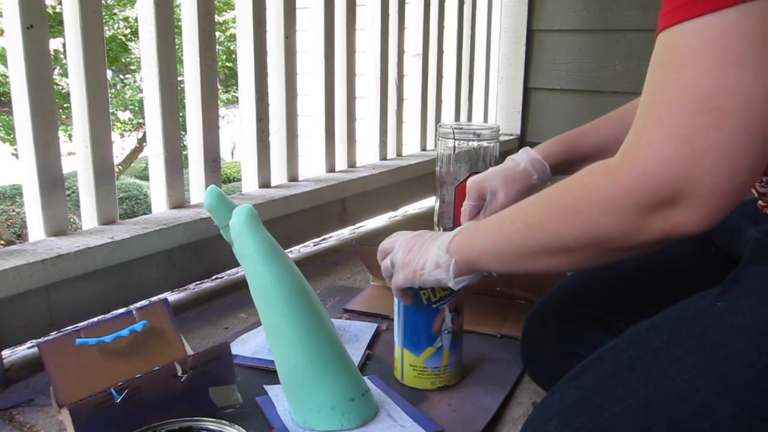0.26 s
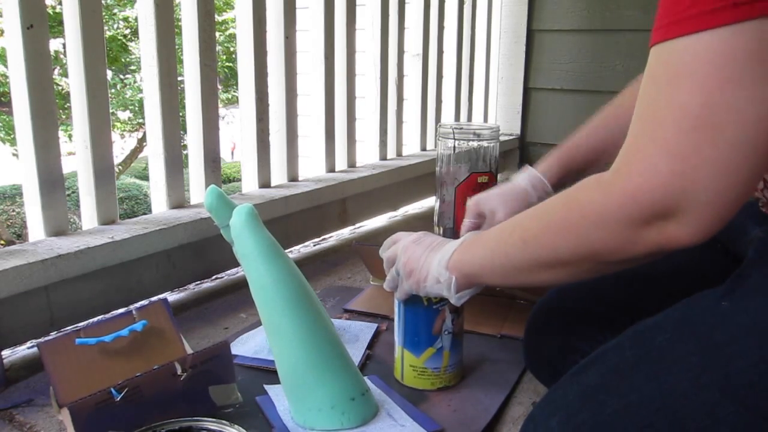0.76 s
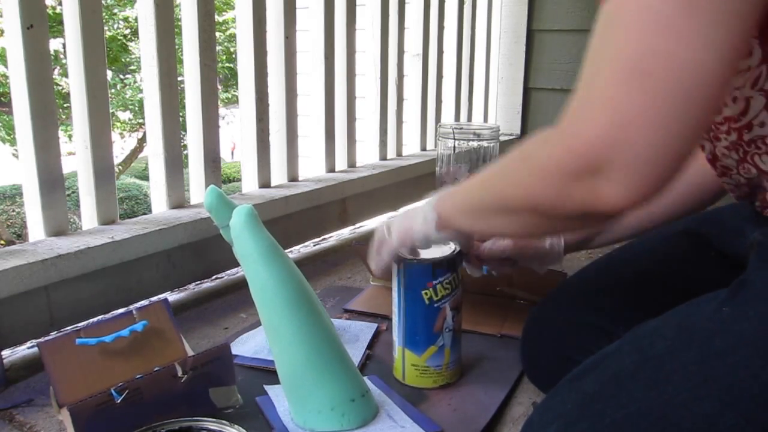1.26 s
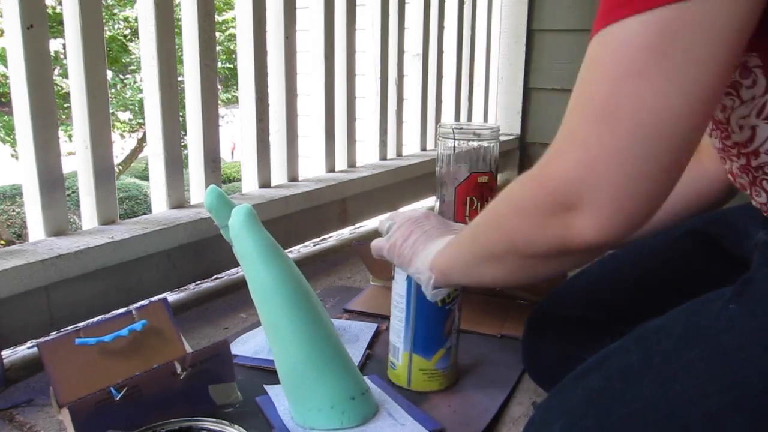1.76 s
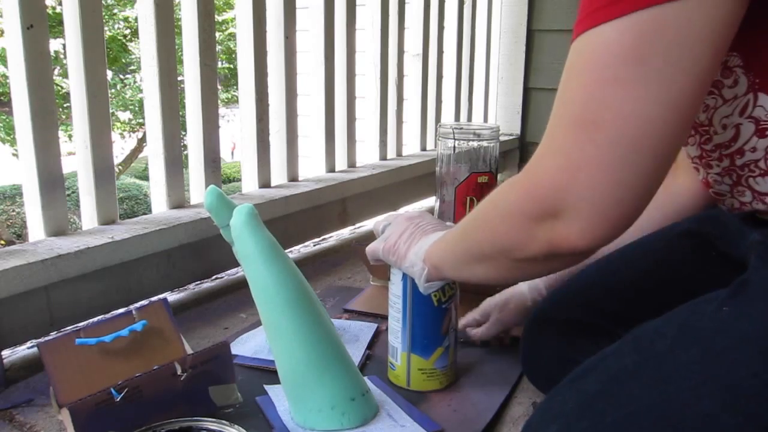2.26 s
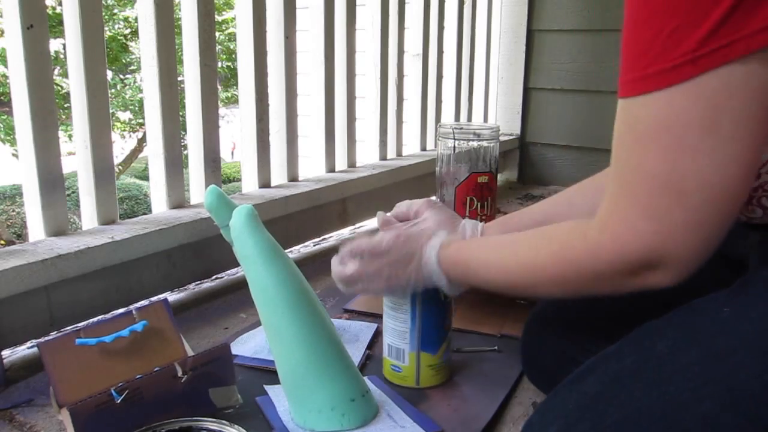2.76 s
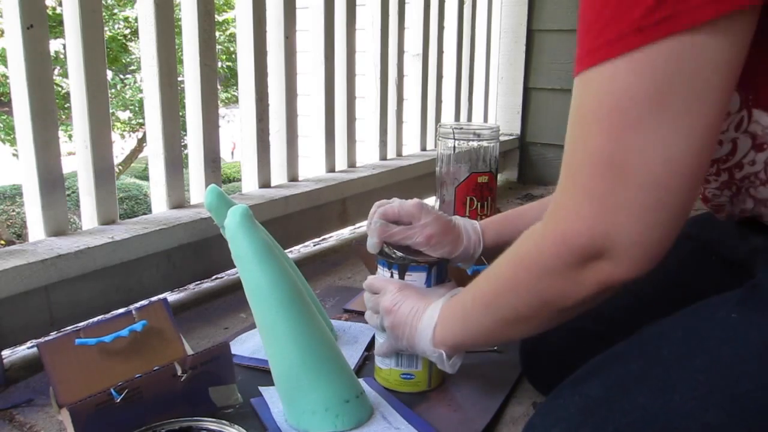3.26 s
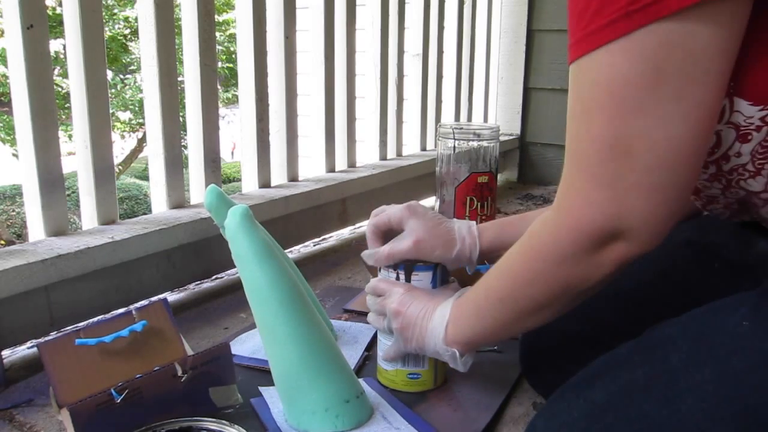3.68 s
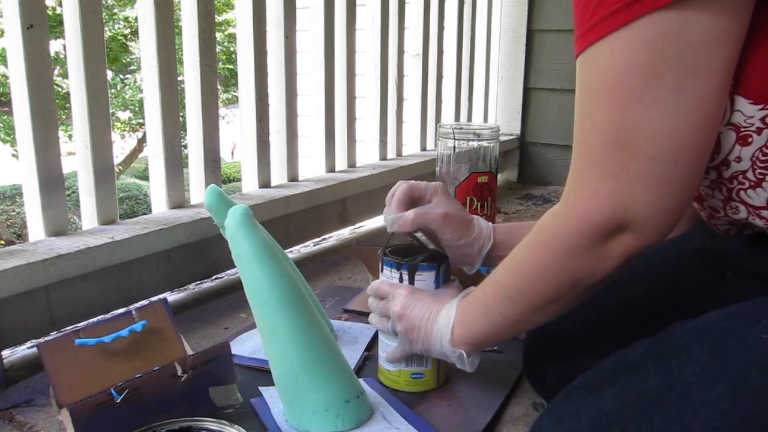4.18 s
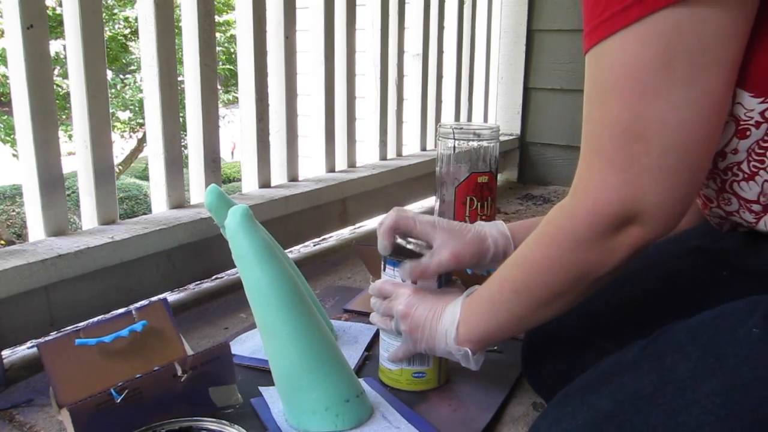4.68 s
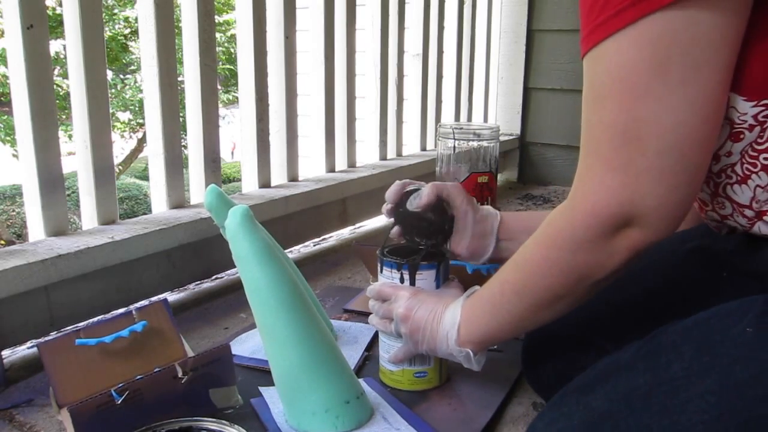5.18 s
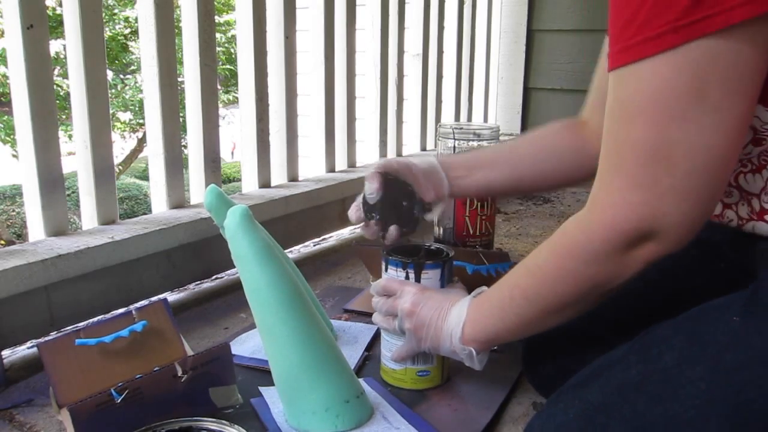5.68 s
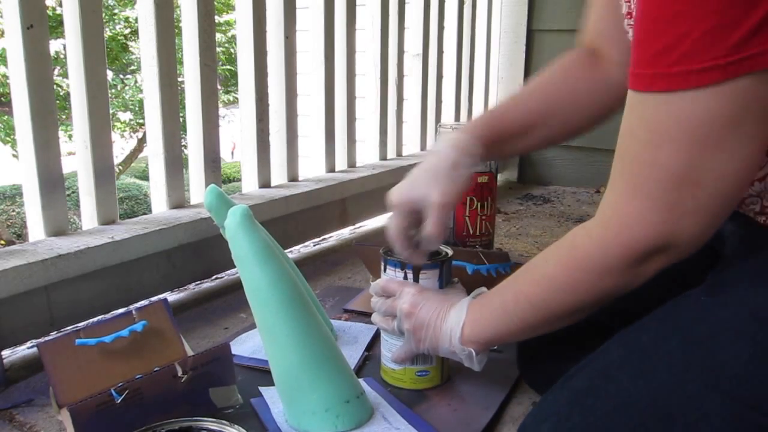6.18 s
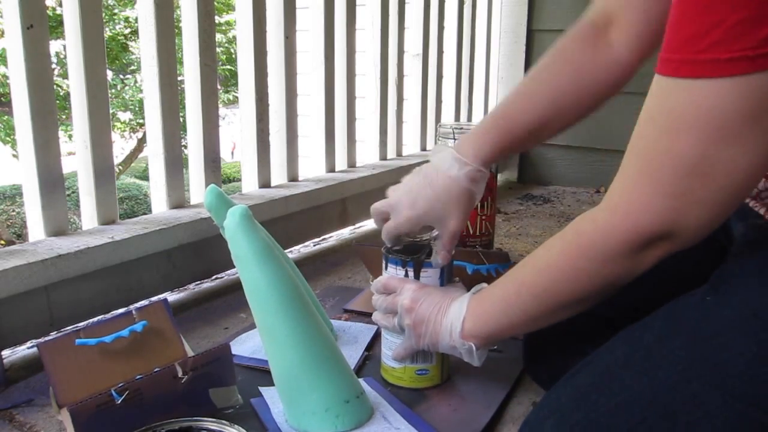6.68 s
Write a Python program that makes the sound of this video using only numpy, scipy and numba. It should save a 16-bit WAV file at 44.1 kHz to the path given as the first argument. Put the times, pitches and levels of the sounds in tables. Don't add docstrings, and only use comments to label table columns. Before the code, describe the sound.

A small stereo camera microphone sits about a metre away on a porch with short, close echoes. Distant engines hum low and waver beneath muffled traffic. From 0.6 to 2 seconds a blade levers at a full metal can's rim: dull ticks, a brisk cluster near 0.9, scraping gloves and small pings around 1.65, a firm click at 2.03. At 2.4 the can knocks hard on the boards in a quick clatter, faintly brushing a glass jar. Gloves rub and crinkle, with a click at 3.0. At 3.9 the lid snaps free, very loud, with hollow air tones rising until 4.3 amid bright crinkles and faint squeaks. Sparse ticks follow, then hard snaps crowd 5.0 to 5.8, the background ducking briefly. A crisp glove swish comes at 6.04, then tiny ticks, a faint steady whine and growing tyre hiss until nearly 7.

```python
import sys
import numpy as np
from scipy import signal
from scipy.fft import rfft, irfft
from scipy.io import wavfile
from scipy.ndimage import uniform_filter1d
from numba import njit

SR = 44100
rng = np.random.default_rng(int(sys.argv[2]) if len(sys.argv) > 2 else 0)


def generate_wav(signal):
    frames = np.transpose(np.atleast_2d(signal))
    scaled = np.clip(frames, -1, 1) * 32767
    pcm = np.round(scaled).astype(np.int16)
    wavfile.write(sys.argv[1], SR, pcm)


def invert_db(x):
    u = np.asarray(x, float) / 20
    return 10 ** u


N = 305172


def on_log(table, hz):
    f, v = np.transpose(table)
    return np.interp(np.log(np.maximum(hz, 1)), np.log(f), v)


def on_time(table):
    s, *columns = np.transpose(table)
    return [np.interp(np.arange(N) / SR, s, c) for c in columns]


def unit(x):
    return x / np.sqrt(np.mean(x ** 2))


def peak(x, db):
    return x * invert_db(db) / np.abs(x).max()


@njit
def svf(x, hz, width):
    y, low_1, low_2 = np.empty(len(x)), 0., 0.
    for i in range(len(x)):
        g, k = np.tan(np.pi * hz[i] / SR), width / hz[i]
        v = (low_1 + g * (x[i] - low_2)) / (1 + g * (g + k))
        low_1, low_2, y[i] = 2 * v - low_1, low_2 + 2 * g * v, k * v
    return y


def band(x, hz, width):
    return svf(x, np.clip(hz * np.ones(len(x)), 20, SR / 2.3), 1. * width)


def treble(x):
    return signal.sosfilt(signal.butter(3, [8700, 14900], "band", fs=SR, output="sos"), x)


def walk(rate):
    hold = int(SR / rate)
    steps = np.repeat(rng.standard_normal(N // hold + 1), hold)
    return 1.31 * uniform_filter1d(uniform_filter1d(steps, hold), hold)[:N]


def add(out, s, sound):
    i = int(s * SR)
    out[..., i:i + sound.shape[-1]] += sound[..., :N - i]


def decay(t60, t):
    return np.exp(-np.log(1000) * t / t60)


def ring(hz, t60, t):
    return np.sin(2 * np.pi * hz * t) * decay(t60, t)


def engines():
    # [t/s, firing f/Hz, level/dB]
    pull = [(0, 51.4, -47), (.5, 52.49, -40), (.9, 54.43, -26.5), (1.6, 57.46, -25), (2.2, 60.16, -29),
            (2.6, 61.9, -37), (3.5, 64.96, -32), (5, 68, -35), (5.3, 68.34, -43.5), (5.9, 70.1, -35),
            (6.92, 71.3, -29)]
    # [t/s, strongest f/Hz, level/dB]
    lump = [(0, 84, -35), (.7, 83.5, -35), (1.2, 87, -30), (1.6, 87.5, -25.5), (1.9, 87, -29),
            (2.3, 88, -30.5), (2.6, 89, -34.5), (3.4, 90.5, -24.5), (3.8, 91.5, -29), (4.7, 93.5, -32),
            (5.3, 94, -43), (6.92, 96, -37)]
    # [multiple of the strongest pitch, level/dB]
    lump_orders = [(1 / 3, -17), (1 / 2, -7), (1, 0), (2, -14.5)]
    # [t/s, f/Hz, level/dB]
    drone = [(0, 127, -29), (.9, 124.8, -35), (1.7, 123, -38.5), (2.2, 126, -33.5), (2.6, 131, -37.5),
             (3.4, 136.7, -42.5), (5, 141.6, -57), (6.92, 140.7, -57)]
    out = 0
    for table, orders in ((pull, [(1, 0)]), (lump, lump_orders), (drone, [(1, 0)])):
        hz, db = on_time(table)
        turn = 2 * np.pi * np.cumsum(hz * (1 + 0.0086 * walk(5))) / SR
        for multiple, order_db in orders:
            level = np.sqrt(2) * invert_db(db + order_db + 2.63 * walk(6))
            out = out + level * np.sin(multiple * turn)
    return out * invert_db(np.array([[-1.1], [1.1]]))


def ducking():
    # [t/s, gain change/dB]
    blows = [
        (2.413, -6.5),
        (3.904, -2),
        (5.078, -3.5),
        (5.155, -4),
        (5.346, -5),
        (5.6, -1.5),
    ]
    t, recover_s = np.arange(N) / SR, 0.57
    return sum(db * (t > s) * np.exp(-np.abs(t - s) / recover_s) for s, db in blows)


def town():
    # [f/Hz, level per Hz/dB]
    tone = [(13, -50), (22, -6), (38, -8), (60, -2), (118, -5), (151, -14), (184, -9.5), (223, -18),
            (330, -10), (512, -13.5), (579, -13.5), (1260, -17), (4280, -35), (7500, -48), (9750, -97),
            (16500, -120)]
    # [f/Hz, likeness 0-1]
    alike = [(60, 0.94), (130, 0.82), (290, 0.99), (640, 0.92), (1410, 0.59), (3100, 0.03), (6820, -0.09),
             (15000, 0.05)]
    # [f/Hz, left minus right/dB]
    tilt = [(60, -3), (110, -2.0), (200, -2), (380, -0.5), (700, -2), (1290, -0.5), (2380, -3), (4400, 0.5),
            (8120, 2), (15000, -9)]
    # [t/s, level/dB]
    traffic = [(0, -28), (.92, -27), (1.31, -28), (2.27, -28), (3.0, -26), (4.0, -29), (5.0, -29),
               (6.92, -28.5)]
    hz = np.arange(N // 2 + 1) * SR / N
    mid, side = rfft(rng.standard_normal((2, N)))
    like = np.clip(on_log(alike, hz), 0, .99)
    shared, apart = np.sqrt(1 + like) * mid, np.sqrt(1 - like) * side
    pair = np.array([shared + apart, shared - apart])
    pair = pair * invert_db(on_log(tone, hz) + np.outer([1, -1], on_log(tilt, hz)) / 2)
    middle = (pair * ((hz > 200) & (hz < 1200))).mean(axis=0)
    size = np.sqrt(np.mean(irfft(middle, N) ** 2))
    return irfft(pair, N) / size * invert_db(on_time(traffic)[0] + ducking() + 0.72 * walk(9))


def strokes(table, resting_db):
    t = np.arange(0, N + 64, 64) / SR
    power, shape = invert_db(2 * resting_db), 1.26
    for s, rise, fall, db in table:
        away = np.where(t < s, (s - t) / max(rise, .01), (t - s) / max(fall, .01))
        power = power + invert_db(2 * (db - 20 * away ** shape))
    return np.interp(np.arange(N) / SR, t, 10 * np.log10(power))


def gloves():
    # [t of most pressure/s, 20 dB rise/s, 20 dB fall/s, level/dB]
    scrapes = [(.622, -0.04, 0, -30.5), (.93, 0.04, 0.19, -25.5), (1.128, -0.3, 0.18, -39),
               (1.28, 0, 0, -44), (1.52, .04, -0.5, -44), (1.65, 0.08, 0.1, -24.5),
               (2.04, 0.1, 0.08, -33.5), (2.31, 0.04, 0.23, -34), (2.4, 0.17, 0.04, -31.5),
               (2.54, 0, 0.3, -41), (2.745, 0.2, 0, -35.5), (2.86, 0.2, 0.1, -33.5), (2.98, .15, 0.17, -35),
               (3.09, 0.2, 0.1, -28.5), (3.33, 0, 0.2, -44), (3.566, 0.05, 0.2, -37), (3.69, -1, .2, -49),
               (3.91, 0.3, -0.1, -40.5), (4.03, 0.13, 0.27, -29.5), (4.285, -0.5, -0.5, -47),
               (4.66, .17, .22, -37), (4.825, -0.2, 0.5, -48), (4.99, 0.1, 0.14, -30.5),
               (5.13, .12, 0.1, -34.5), (5.354, 0.1, 0.08, -33), (5.45, 0.35, 0.04, -38.5),
               (5.535, 0.2, .05, -37), (5.655, 0.07, 0.07, -33.5), (5.745, .03, 0.2, -41),
               (6.04, .06, 0.1, -45)]
    # [t of most pressure/s, 20 dB rise/s, 20 dB fall/s, level/dB]
    swishes = [(.52, .05, .05, -53), (.622, .03, .07, -47), (.744, .03, .09, -50), (.92, .075, .13, -37),
               (1.19, .12, .3, -50), (1.52, .03, .05, -50), (1.655, .07, .12, -47), (2.04, .03, .07, -45),
               (2.31, .03, .1, -43), (2.385, .07, .07, -42), (2.75, .12, .06, -37.5), (3.09, .32, .13, -38),
               (3.33, .3, .3, -54), (3.566, .06, .08, -41), (3.69, .03, .04, -48), (3.77, .05, .05, -54),
               (3.96, .03, .04, -42), (4.03, .04, .11, -35), (4.07, .06, .07, -34), (4.16, .12, .045, -34),
               (4.23, .06, .05, -49), (4.285, .025, .1, -44), (4.62, .11, .27, -45),
               (4.825, .025, .045, -41), (4.945, .04, .15, -36), (5.06, .12, .2, -35),
               (5.354, .07, .075, -33), (5.535, .07, .055, -40), (6.035, .045, .07, -25),
               (6.36, .04, .07, -47), (6.52, .08, .3, -54), (6.83, .045, .26, -41.5)]
    # [t/s, resonance f/Hz]
    taut = [(0, 10200), (2.29, 10500), (2.41, 12300), (2.51, 10500), (3.1, 10200), (3.33, 11800),
            (3.57, 10500), (4.14, 12100), (4.35, 10800), (4.67, 11000), (4.83, 12450), (5.3, 10900),
            (5.97, 10900), (6.04, 9700), (6.2, 10800), (6.92, 11200)]
    # [t/s, left minus right/dB]
    hand = [(0, 2.5), (4, 3.5), (4.2, 2), (5.9, 2), (6.0, 4), (6.2, 0), (6.92, 3.5)]
    resting_wall_db, resting_film_db = -54, -60
    grains_per_s, scatter_db = 1800, 2.0
    wall_db, film_db = strokes(scrapes, resting_wall_db), strokes(swishes, resting_film_db)
    wall_hz = 4000 + 51 * (wall_db - resting_wall_db)
    film_hz, pan_db = on_time(taut)[0], on_time(hand)[0]
    layers = []
    for _ in range(2):
        size_db = np.minimum(scatter_db * rng.exponential(size=N), 11)
        slips = (rng.random(N) < grains_per_s / SR) * invert_db(size_db) * rng.standard_normal(N)
        layers.append(unit(slips) + .8 * rng.standard_normal(N))
    both = np.array([layers[0] + 0.53 * layers[1], layers[0] - 0.77 * layers[1]])
    both = both * invert_db(2.1 * walk(70) + 1.1 * walk(220))
    wall, film = [], []
    airy = 0.25 * np.clip((film_hz - 9800) / 900, 0, 1)
    for x in both:
        body = band(x, wall_hz, 3100) + 3.1 * band(x, 1740, 2400)
        wall.append(band(body, 3800, 6800))
        film.append(treble(band(x, film_hz, 2800) + airy * x))
    wall, film = unit(np.array(wall)), unit(np.array(film))
    sides_db = np.array([pan_db, -pan_db]) / 2
    return invert_db(wall_db - 1.0) * wall + invert_db(film_db + 1.7 + sides_db) * film


def ticks():
    # [t/s, peak/dB, f/Hz, treble peak/dB]
    prying = [(.6065, -19, 2550, -26), (0.7324, -26, 2960, -44), (0.7489, -23.5, 2870, -33.5),
              (0.8683, -33, 2550, -37), (0.906, -17, 2600, -45), (0.9185, -13, 5830, -36),
              (0.923, -13, 5100, -32), (0.95, -10.5, 5430, -29), (.962, -17, 4210, -42),
              (.972, -19, 6000, -47), (1.034, -23, 6090, -38.5), (1.1193, -15, 6000, -48.5),
              (1.621, -20, 4000, -55), (1.6543, -19, 3110, -54), (1.6628, -16, 3030, -52),
              (1.677, -23, 2700, -54), (1.8068, -31, 2730, -37), (1.86, -24, 2540, -34),
              (1.998, -29, 2970, -41), (2.0284, -11, 2650, -51), (2.411, -11.5, 3300, -32),
              (2.9915, -18, 4130, -28)]
    # [t/s, peak/dB, f/Hz, treble peak/dB, lid ring peak/dB]
    snaps = [(2.3975, -15.5, 3690, -44, -24), (3.8968, -8.5, 4940, -44, -21), (3.904, -3, 4400, -22, -16.5),
             (4.0462, -12, 4850, -30, -23), (4.0784, -21, 4000, -16, -24), (4.091, -12.5, 5560, -22, -36),
             (4.131, -19.5, 5610, -29.5, -27), (4.268, -19, 4730, -22, -22), (4.2862, -16, 6450, -24, -33),
             (4.6174, -21.5, 3810, -27, -21), (4.6604, -15.5, 3750, -32, -25),
             (4.9863, -8.5, 2560, -14.5, -17), (5.0773, -3, 4660, -18, -15), (5.1116, -9, 5770, -14.5, -22),
             (5.125, -24, 4640, -30, -24), (5.1345, -11, 6000, -30, -34), (5.154, -5.5, 5400, -40, -16.5),
             (5.3074, -23, 5040, -19.5, -19), (5.346, -11, 5530, -11, -17), (5.435, -7.5, 6700, -12, -23),
             (5.5987, -9, 4520, -12.5, -17), (5.6438, -14, 3530, -16, -17.5), (5.7327, -10, 2780, -17, -41),
             (5.7849, -14, 5470, -20.5, -27)]
    # [t/s, peak/dB, f/Hz, treble peak/dB]
    tack = [(3.5568, -26, 2540, -26.5), (3.8678, -24, 3650, -31), (4.0043, -29, 2530, -30),
            (4.2012, -23.5, 5640, -41), (4.556, -29, 2564, -36), (4.719, -27, 5500, -27.5),
            (4.8232, -41, 2610, -39), (4.887, -44, 5000, -37), (4.9308, -26, 2800, -23.5),
            (4.9436, -18, 3050, -29), (5.328, -18.5, 3850, -17), (5.498, -25, 3790, -24),
            (5.5094, -18, 6230, -33), (5.526, -19, 6300, -32), (5.5396, -19, 5100, -20),
            (5.8301, -31, 2596, -27), (5.8397, -36, 3250, -28), (5.854, -37, 3090, -30),
            (5.869, -37.5, 2940, -28), (5.877, -27, 4000, -44), (5.99, -37.5, 2750, -25),
            (6.0004, -40.5, 2490, -22), (6.325, -38, 6000, -40), (6.2559, -25, 4900, -37),
            (6.346, -26, 5460, -24)]
    rows = [(*r, r[1] - 13.5, 0.017) for r in prying]
    rows += [(*r, .0085) for r in snaps]
    rows += [(*r, r[1] - 12, 0.011) for r in tack]
    out, t = np.zeros(N), np.arange(3000) / SR
    for s, db, hz, treble_db, lid_db, t60 in sorted(rows):
        noise = rng.standard_normal((3, len(t)))
        lid_hz = 1750 * (1 + 0.029 * rng.standard_normal())
        shape = decay(1.05 * t60, t) + invert_db(-20) * decay(0.096, t)
        noise[:, 12] += 10.
        noise = noise * shape * (1 - np.exp(-t / 0.00034))
        crack = band(noise[0], hz, 1300) + 0.38 * band(noise[0], 5600, 4600)
        rim = band(crack, .5 * hz + 2200, 7800)
        spit = noise[1] * (0.39 + np.exp(-t / 0.0014))
        spit = treble(spit + 1.5 * band(spit, 9950, 2800))
        lid = band(band(noise[2], lid_hz, 410), lid_hz, 1070)
        tick = peak(rim, db + 2.5) + peak(spit, treble_db + 9.5) + peak(lid, lid_db + 2.0)
        add(out, s + .0006, tick)
    return out


def film_folds():
    # [t/s, peak/dB, f/Hz]
    creases = [(.893, -22, 5590), (.9255, -16, 5200), (1.0194, -28, 4480), (2.2996, -24.5, 3200),
               (2.3362, -23, 3500), (3.242, -24.5, 2510), (3.548, -32, 11000), (3.6677, -40.5, 12960),
               (3.6826, -38, 9830), (3.6866, -36.5, 10600), (3.7475, -39, 10200), (3.7864, -32, 11300),
               (3.9525, -27, 11800), (3.969, -22, 11900), (3.973, -25, 11200), (4.015, -25, 9800),
               (4.0245, -22, 12200), (4.037, -22, 12200), (4.0475, -17, 12400), (4.063, -24, 13000),
               (4.099, -22, 12500), (4.1305, -14, 12600), (4.165, -23, 12500), (4.192, -30, 9200),
               (4.202, -26, 11500), (4.8857, -29, 14200), (5.007, -23, 4500), (5.0529, -22, 11200),
               (5.1347, -14, 13000), (5.2873, -31, 11300), (5.498, -27, 5000), (5.518, -24, 9800),
               (5.5185, -27, 5500), (5.56, -28, 11000), (5.72, -32, 14000),
               (2.5273, -31, 3130), (2.5333, -32, 3110), (2.6295, -32, 3660), (2.6699, -31, 3850),
               (2.7064, -31, 5240), (2.7308, -24, 10000), (2.7368, -22, 9740), (2.8465, -26, 3040),
               (2.9014, -33, 3730), (2.9064, -30, 3100), (2.9909, -13.5, 4130), (3.154, -25.5, 3010),
               (3.3704, -30, 3220), (3.5075, -33, 2990),
               (1.0353, -32, 10000), (1.0388, -31, 10400), (1.1193, -34, 9950), (1.178, -35, 11500),
                (1.1935, -36, 11500), (1.2104, -39, 10600), (1.3047, -36, 10200), (1.4057, -48, 9890),
                (1.5167, -36, 9580)]
    # [t/s, length/s, level/dB, first f/Hz, last f/Hz]
    squeaks = [
        (.876, 0.03, -36.5, 5200, 5800),
        (3.948, .03, -44.5, 11800, 11500),
        (4.01, .035, -37, 9900, 9500),
        (4.092, 0.11, -34.5, 12100, 11500),
        (4.095, .09, -37, 14000, 13500),
        (5.17, 0.073, -47, 11600, 11300),
        (1.635, .04, -35, 5500, 6300),
    ]
    out, t = np.zeros(N), np.arange(1500) / SR
    for s, db, hz in creases:
        burst = rng.standard_normal(len(t)) * decay(0.014, t)
        width = 0.26 * hz
        add(out, s, peak(band(band(burst, hz, width), hz, 3 * width), db))
    rub = rng.standard_normal(N) * invert_db(3. * walk(150))
    for s, length, db, first_hz, last_hz in squeaks:
        part = rub[int(s * SR):int((s + length) * SR)]
        hz, width = np.linspace(first_hz, last_hz, len(part)), 800
        squeak = unit(band(band(part, hz, width), hz, 3 * width))
        add(out, s, invert_db(db) * squeak * signal.windows.tukey(len(part), .3))
    return out * invert_db(np.array([[1.5], [-1.5]]))


def metal_pings():
    # [t/s, peak/dB, f/Hz, t60/s]
    pings = [(1.6535, -19, 3030, .025), (1.6605, -16.5, 3090, 0.036), (1.6665, -19, 3070, .025),
             (1.679, -17.5, 1560, .03), (5.5995, -11.5, 1776, 0.029), (5.5995, -14, 2000, 0.024),
             (5.6085, -27, 1776, .07), (4.2685, -12, 1700, 0.02), (4.131, -22, 1700, .02),
             (3.9045, -15, 1540, 0.036), (2.4105, -7, 2470, 0.016), (2.4105, -3, 3000, 0.0098),
             (2.4105, -6.5, 3720, 0.018), (2.4255, -12, 1070, 0.019), (2.7, -18, 1200, .03),
             (2.383, -27, 3300, .03), (.9062, -10, 2540, 0.013)]
    out, t = np.zeros(N), np.arange(6000) / SR
    for s, db, hz, t60 in pings:
        add(out, s, invert_db(db) * ring(hz, t60, t) * (1 - np.exp(-t / 0.00044)))
    return out


def brushed_jar():
    # [t/s, level/dB]
    brushing = [(2.3, -89), (2.345, -41), (2.385, -45), (2.415, -43), (2.44, -59), (2.47, -88)]
    hz, width = 11950, 160
    glass = unit(band(band(rng.standard_normal(N), hz, width), hz, 3 * width))
    return invert_db(on_time(brushing)[0]) * glass


def can_knocks():
    # [t/s, peak/dB, t60/s]
    blows = [
        (2.354, -18, 0.03),
        (2.3665, -16, 0.013),
        (2.3992, -5.5, 0.026),
        (2.4126, -3, 0.026),
        (2.4243, -11, 0.018),
    ]
    # [f/Hz, width/Hz, level/dB]
    can = [(640, 180, 1), (1020, 76, 9), (1184, 130, 4.5), (1570, 130, 7.5), (2000, 150, -10),
           (3600, 400, -6)]
    out, t = np.zeros(N), np.arange(6000) / SR
    for s, db, t60 in blows:
        chatter = (rng.standard_normal(len(t)) + 5.2 * (t == 0)) * decay(t60, t)
        blow = band(chatter, 1300, 2200)
        blow = uniform_filter1d(uniform_filter1d(blow, size=7), size=7)
        body = sum(invert_db(g) * band(blow, hz, width) for hz, width, g in can)
        add(out, s, peak(body, db + 0.5))
    return out


def hollow_air():
    # [t/s, peak/dB, f/Hz, t60/s]
    tones = [
        (3.866, -10, 399, 0.076),
        (3.905, -10.5, 478, .05),
        (3.922, -15.5, 459, 0.18),
        (4.047, -17, 554, .09),
        (4.093, -12.5, 590, 0.077),
        (4.272, -15.5, 692, 0.09),
        (4.302, -19, 352, .1),
    ]
    out, t = np.zeros(N), np.arange(6000) / SR
    for s, db, hz, t60 in tones:
        puff = unit(band(rng.standard_normal(len(t)), 1.13 * hz, 120)) * decay(1.4 * t60, t)
        tone = ring(hz, t60, t) + 0.15 * puff
        add(out, s, invert_db(db - 3.5) * tone * (1 - np.exp(-t / 0.00073)))
    return out


def whine():
    # [t/s, f/Hz, level/dB]
    line = [(5.9, 478, -62), (6.1, 479, -43), (6.6, 482, -40.5), (6.92, 486, -42)]
    hz, db = on_time(line)
    return np.sqrt(2) * invert_db(db + 1.5 * walk(5)) * np.sin(2 * np.pi * np.cumsum(hz) / SR)


def tyres():
    # [t/s, level/dB]
    approach = [(6.0, -66), (6.45, -44.5), (6.92, -37.5)]
    hiss = [band(band(x, 2290, 1500), 2500, 2500) for x in rng.standard_normal((2, N))]
    return invert_db(on_time(approach)[0]) * unit(np.array(hiss))


def porch(x):
    t, t60_s, echo_db = np.arange(8000) / SR, 0.15, -7
    tail = rng.standard_normal((2, len(t))) * decay(t60_s, t) * (t > .002)
    tail = tail / np.sqrt(np.sum(tail ** 2, axis=1, keepdims=True))
    return x + invert_db(echo_db) * signal.fftconvolve(x[None], tail, axes=1)[:, :N]


def scene():
    near = porch(ticks() + can_knocks() + hollow_air() + metal_pings() + brushed_jar())
    lag = band(np.roll(near.mean(axis=0), shift=1), 12300, 8500)
    near = near + 0.63 * np.array([lag, -lag])
    return near + gloves() + engines() + town() + tyres() + film_folds() + whine()


def low_pass(x):
    return signal.sosfilt(signal.butter(12, 16530, fs=SR, output="sos"), x)


def record(dry):
    port_hz, port_width_hz = 8200, 1450
    for stage in range(2):
        dry = np.array([c - .97 * band(c, port_hz, port_width_hz) for c in dry])
    x = signal.sosfilt(signal.ellip(8, .2, 60, 15900, fs=SR, output="sos"), dry)
    return low_pass(np.clip(x, -1, 1))


dry = scene()
out = record(dry)
generate_wav(out)
```